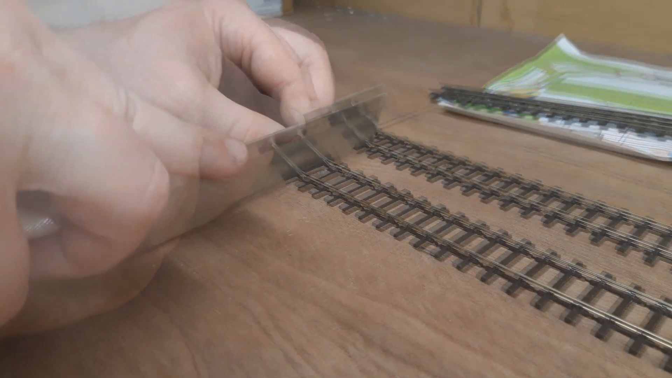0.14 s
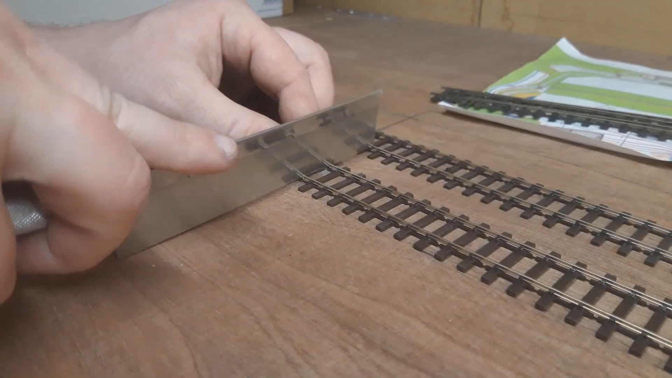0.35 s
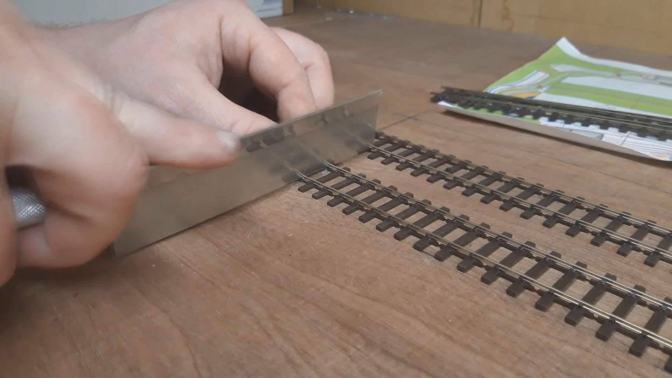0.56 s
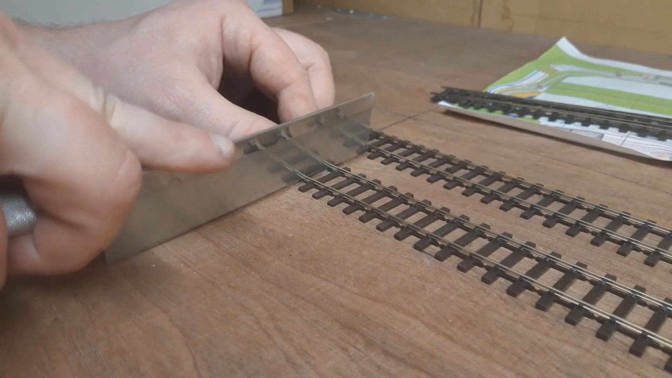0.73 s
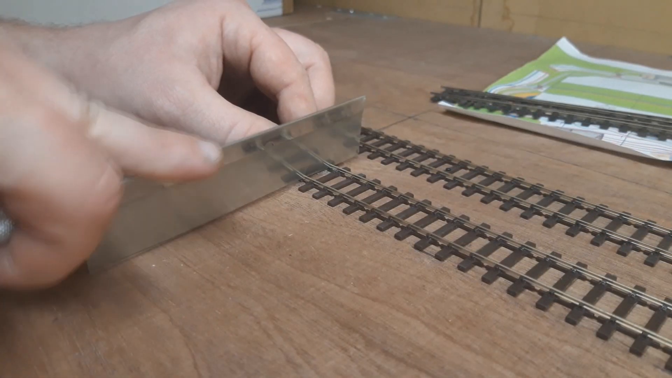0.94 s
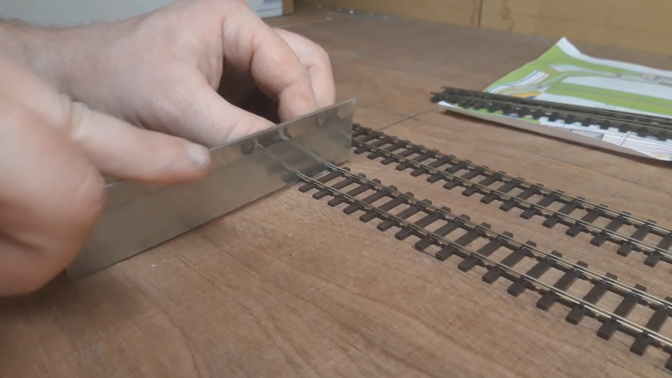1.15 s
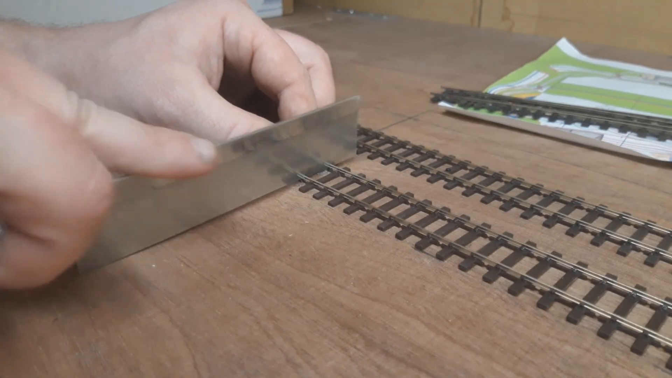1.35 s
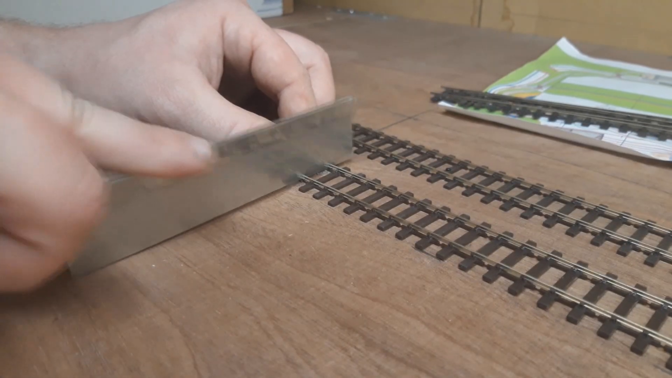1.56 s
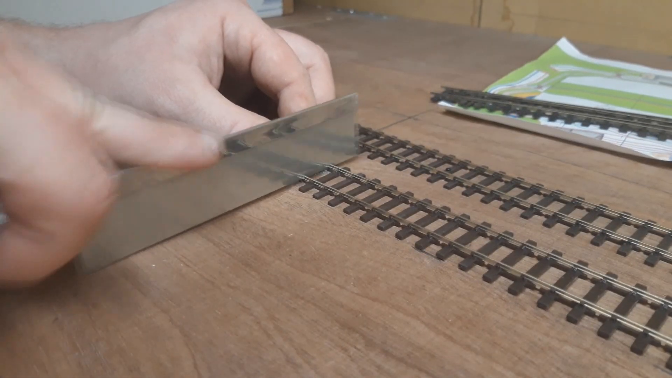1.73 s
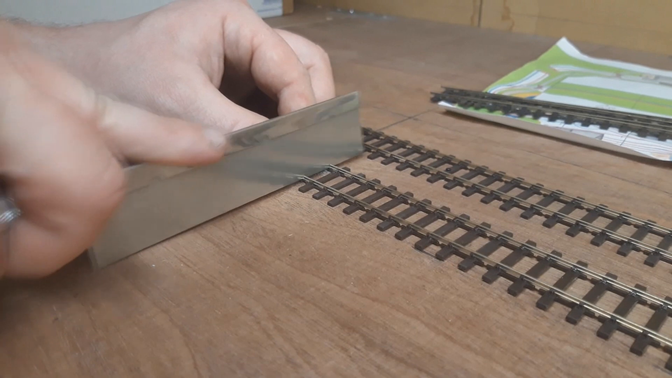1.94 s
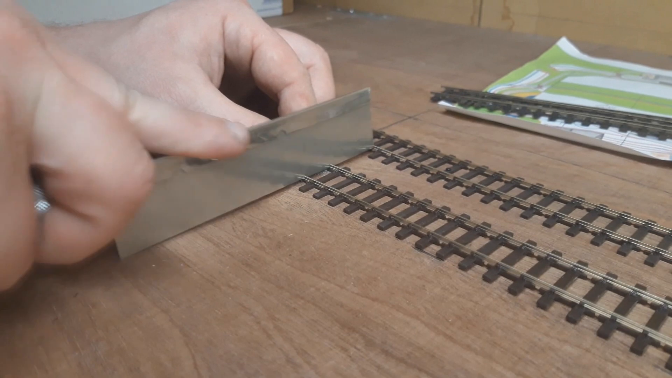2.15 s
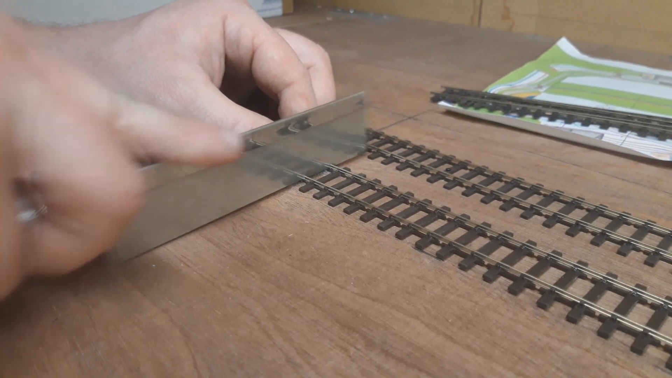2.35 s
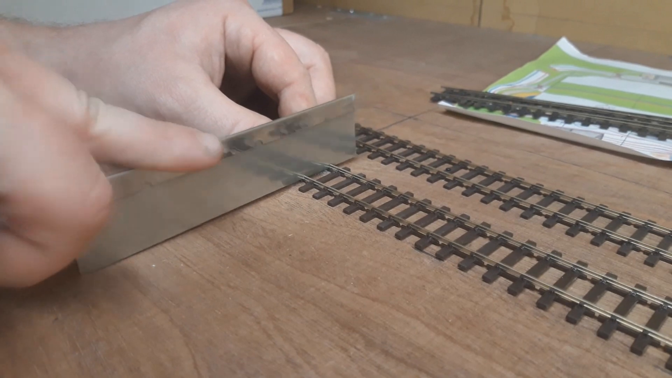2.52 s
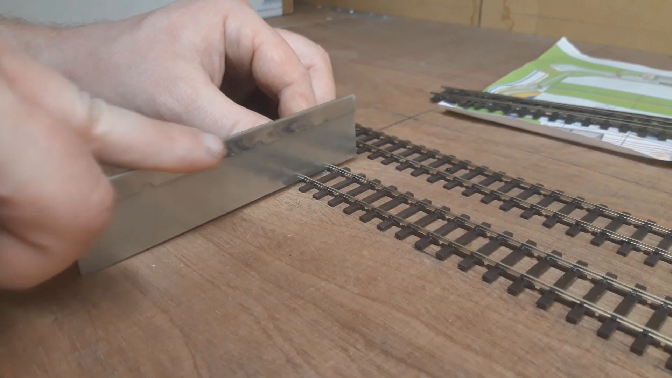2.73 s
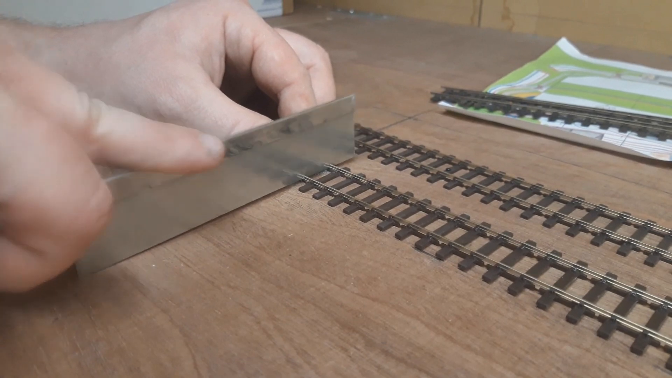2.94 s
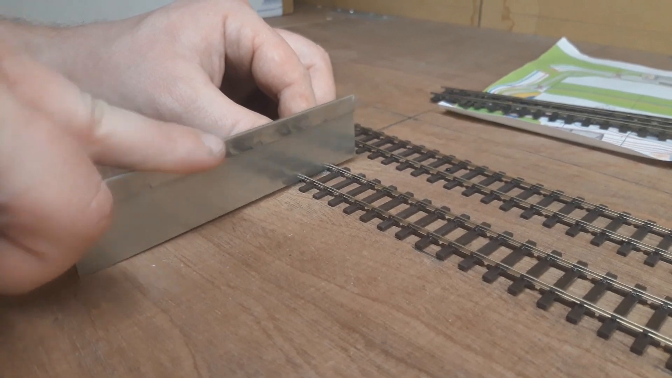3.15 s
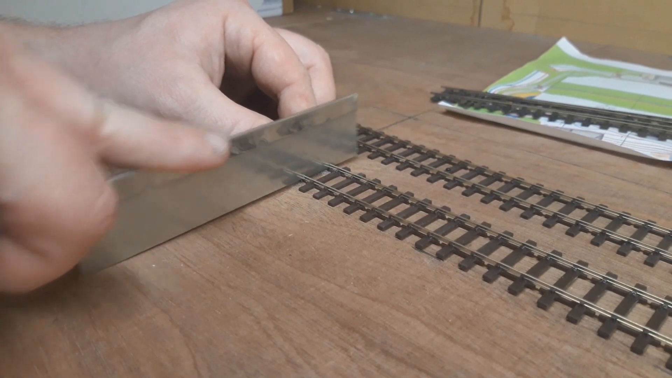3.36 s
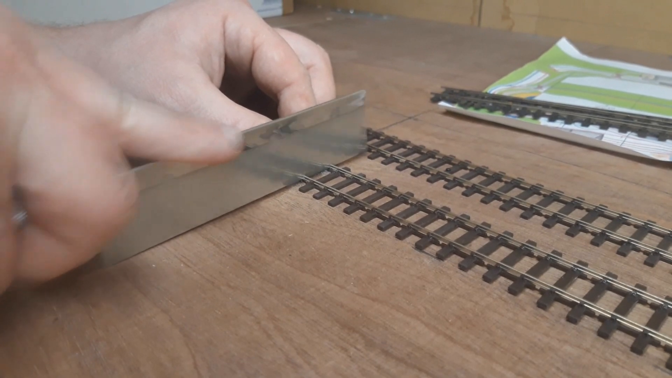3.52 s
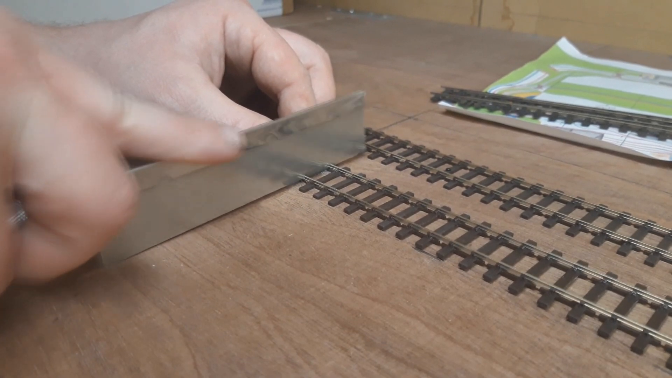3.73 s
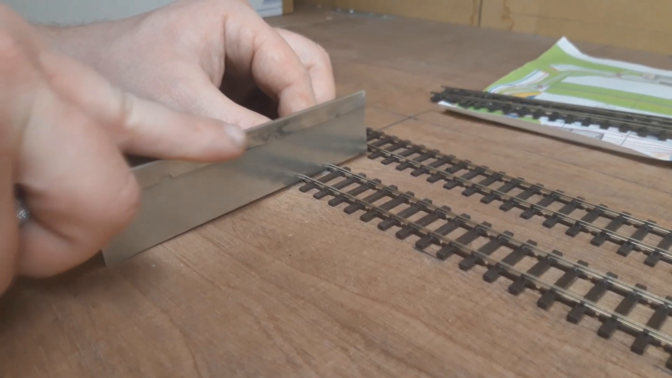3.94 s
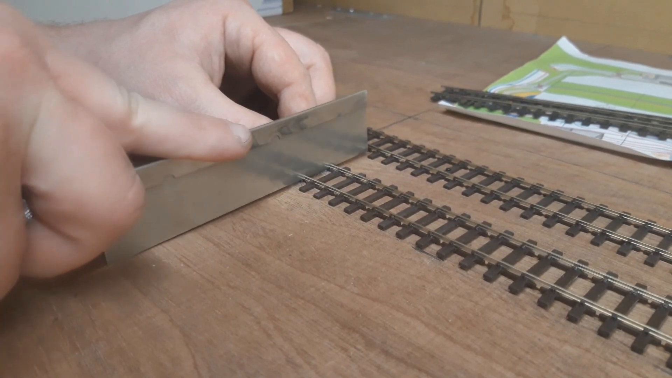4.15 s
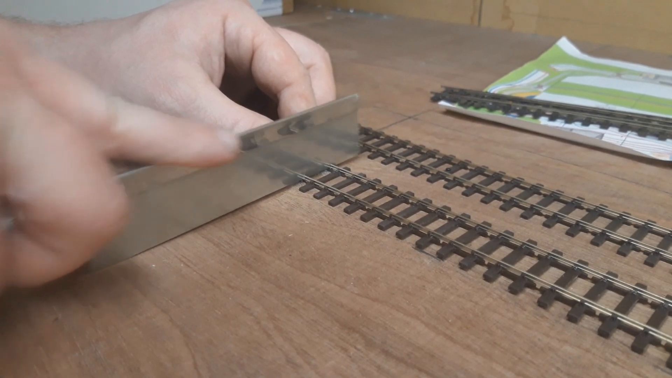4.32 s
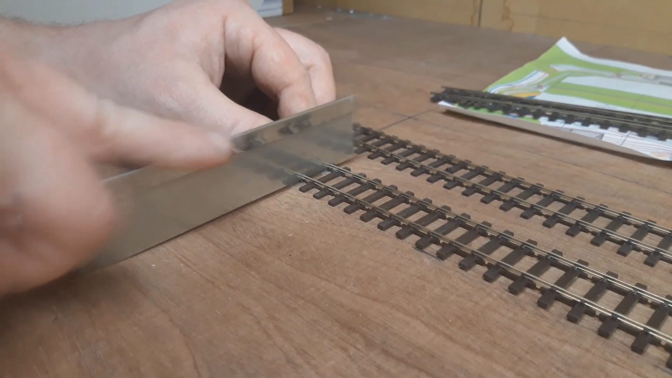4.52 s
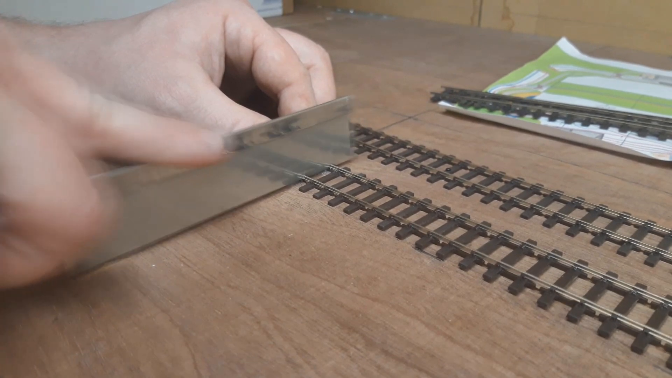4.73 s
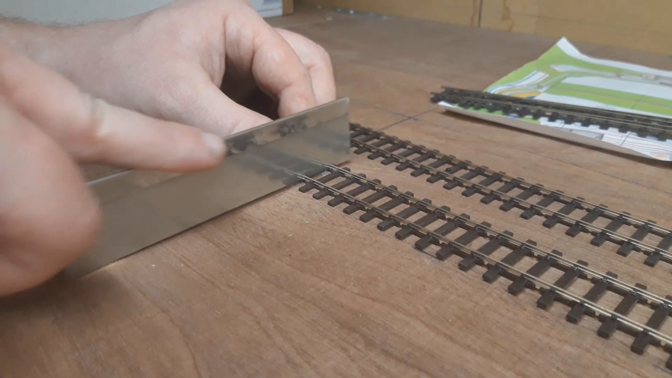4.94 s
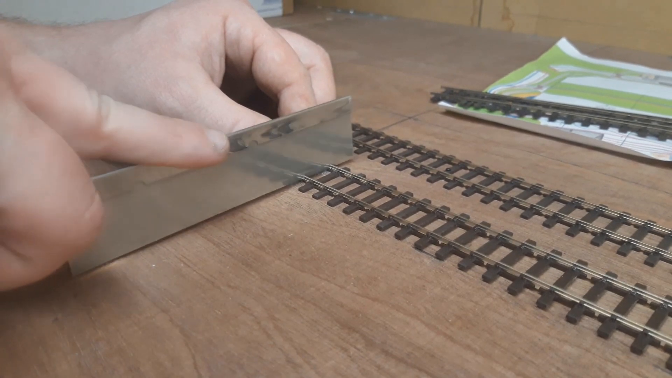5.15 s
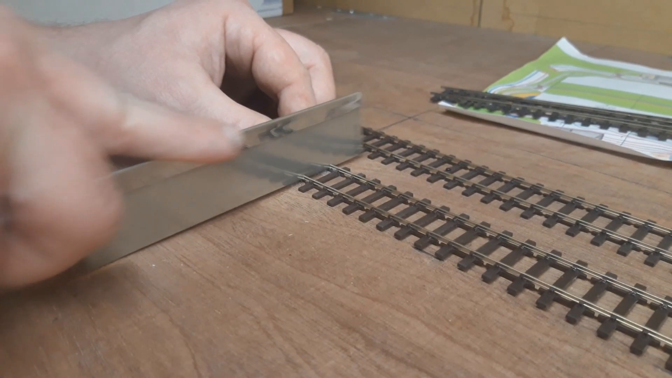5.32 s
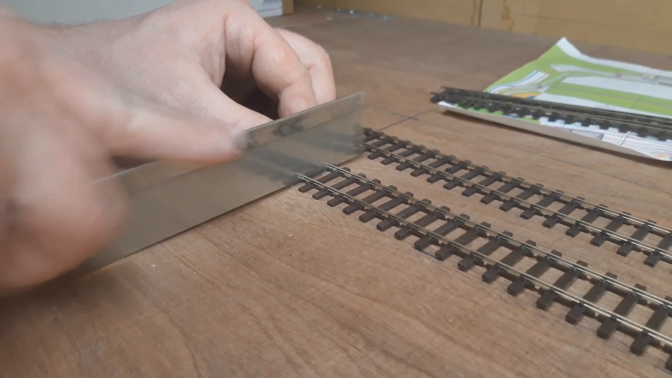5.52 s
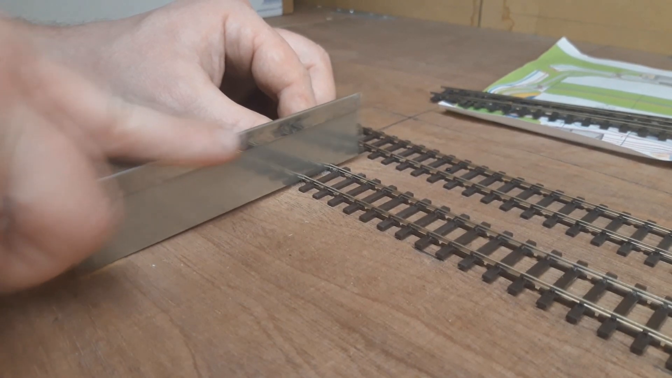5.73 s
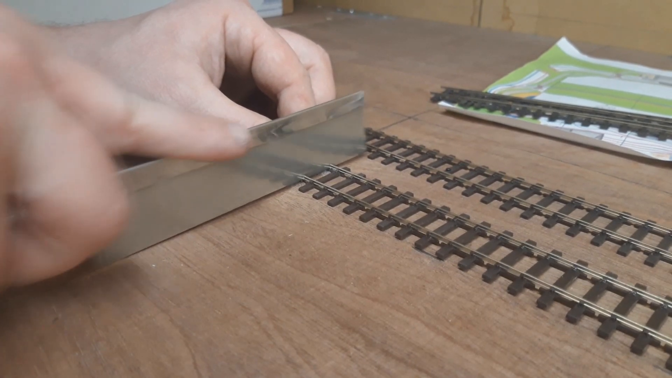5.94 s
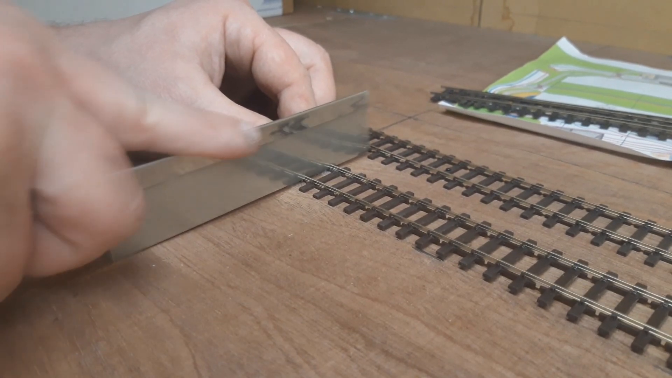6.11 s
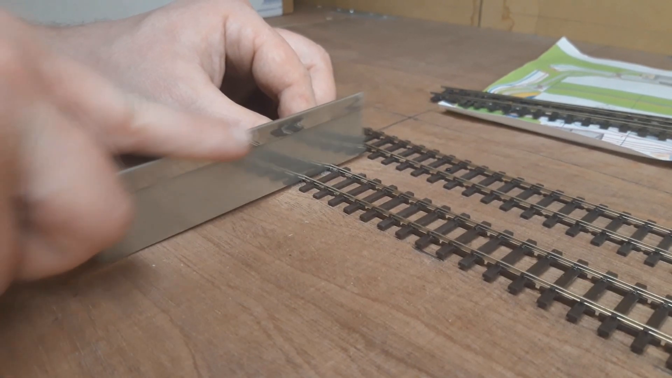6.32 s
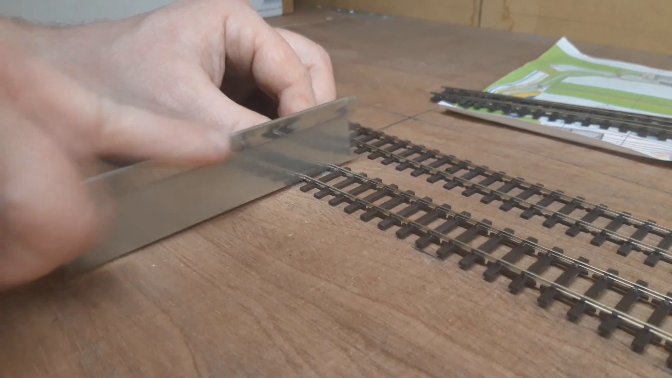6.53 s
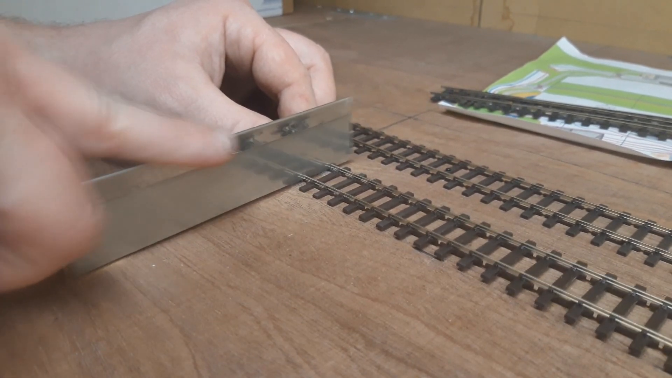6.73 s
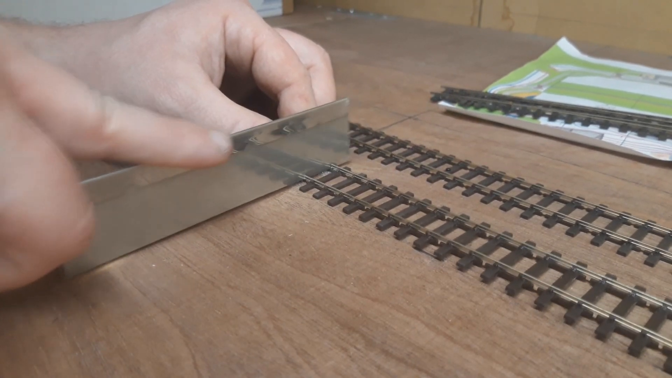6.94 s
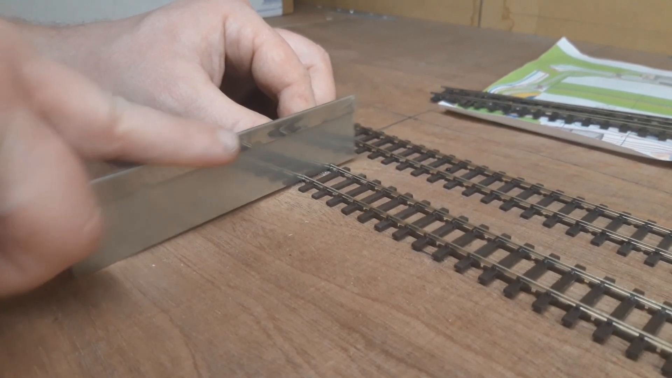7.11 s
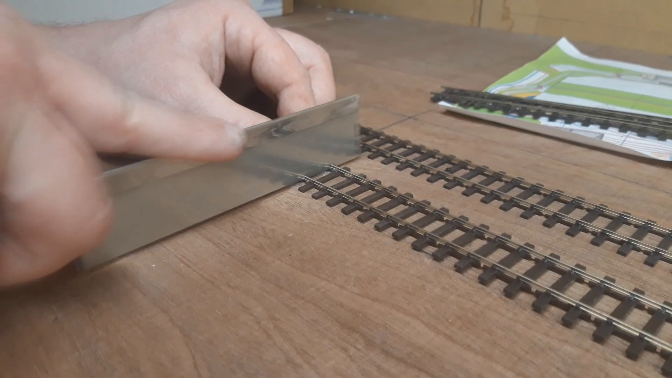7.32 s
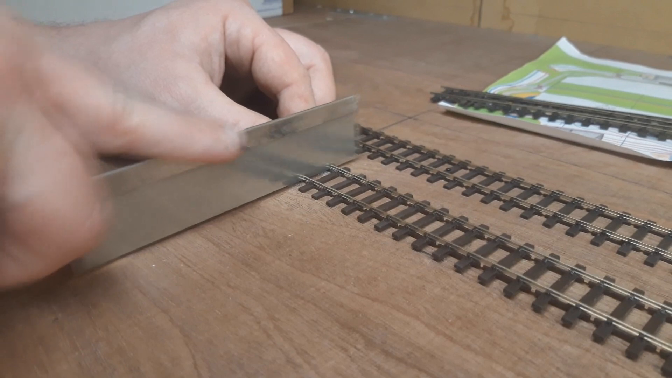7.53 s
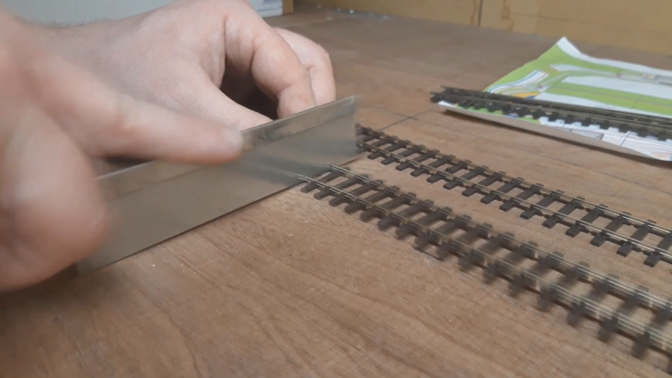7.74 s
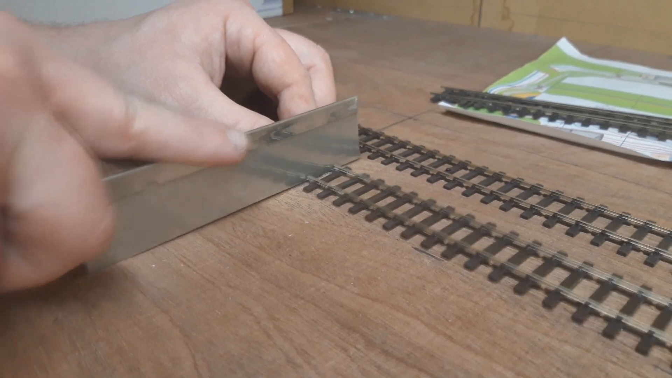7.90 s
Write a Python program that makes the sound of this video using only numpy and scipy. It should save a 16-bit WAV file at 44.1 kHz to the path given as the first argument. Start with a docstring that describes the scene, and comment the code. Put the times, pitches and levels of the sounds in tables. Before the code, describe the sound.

A close, mono-like perspective in a small room with faint low room tone. At 0.1 s a soft tap, around 0.27 s a brief light slide of the blade, then small knocks and a loud sharp snap at 0.64 s. From 0.64 to 2.05 s the saw catches in short separate rasps of under a tenth of a second, fairly dull, with clicks, strongest near 1.47 s. From 2.1 to 7.55 s it saws steadily at about nine strokes a second, alternating growling pushes and lighter returns, gritty bright thin steel over a buzzing wooden tabletop. There is a brief dip around 3.35 s; strokes are hardest from 5.5 to 6.6 s, with hard snaps at 6.5-6.6 s. After 6.8 s it falters and lightens, snags clicking often, a sharp one at 7.7 s, ending in weak broken scrapes to about 8 s.

```python
"""A small razor saw cuts a model railway rail held against a guide on a wooden table, close by in a small room.
The blade is set down with a few taps, catches in short bursts, then makes about nine strokes a second.
Trains of tooth blows, partly torn into noise, excite the resonances of thin steel and table top.
Now and then a tooth snags and snaps free: an impulse with decaying noise. Friction noise marks the blade
sliding into place, a short room tail follows the sounds, and a faint room tone lies beneath."""
import sys
import numpy as np
from scipy import signal
from scipy.fft import rfft, irfft, next_fast_len
from scipy.io import wavfile
from scipy.ndimage import uniform_filter1d, map_coordinates

SR = 44100
rng = np.random.default_rng(int(sys.argv[2]) if len(sys.argv) > 2 else 0)


def inscribe(sig):
    """Save sig as 16-bit PCM at rate SR to the path in sys.argv[1].

    A 1-D sig is mono; a 2-D sig holds one channel per row.
    Samples are clipped to [-1, 1] before scaling.
    """
    pcm = np.round(np.clip(np.atleast_2d(sig).T, -1, 1) * 32767)
    wavfile.write(sys.argv[1], SR, pcm.astype(np.int16))


N = 355877

# Room tone spectrum. Each row: frequency in Hz, relative density in dB per Hz.
AIR_SPECTRUM = [(25, -13), (115, 0.5), (350, -19.5), (1100, -34.5), (16000, -35)]
# Reverberation of the room. Each row: frequency in Hz, time to decay by 60 dB in seconds.
ROOM_DECAY = [(100, 0.57), (260, 0.22), (700, .18), (1800, 0.24), (13000, 0.13)]
# The blade slides lightly into place. Each row: time in seconds, friction level in dB.
SLIDE_LEVEL = [(0.21, -75), (0.235, -72), (0.275, -51), (0.311, -68), (0.35, -82)]
# Taps and snagging teeth. Each row: start in seconds, snap level in dB,
# table knock in dB relative to the snap, before a cut common to all knocks.
SNAG_EVENTS = [(0.0997, -28, 0), (0.404, -47, 10.5), (0.4746, -52, 0), (0.6, -31, -2.5), (0.6397, -5.5, 3),
               (0.7455, -14, -33), (0.9978, -13.5, -12), (1.4515, -17, -2), (1.472, -6, -7),
               (1.654, -10.5, -15), (1.9584, -21, -13), (2.4408, -17, -3), (3.3047, -22, -12),
               (6.096, -17, -8), (6.5126, -12, -7), (6.5503, -0.5, -16), (6.6001, -3, -10.5),
               (6.796, -15, -19), (7.0673, -16, -2), (7.139, -16, 0.5), (7.2304, -17.5, -10.5),
               (7.3634, -13, -8), (7.45, -19.5, -10), (7.668, -13, -8), (7.6947, -3.5, -11.5),
               (7.785, -17, -20), (7.8607, -22.5, 7), (7.8932, -16, -5)]
# Broad colour of the table top. Each row: frequency in Hz, relative density in dB per Hz.
TABLE_SPECTRUM = [(30, -36), (55, -17.5), (78, -7), (110, -20), (165, -0.5), (265, -7.5), (400, -3),
                  (520, -4.5), (800, -3.5), (1000, -17), (1400, -17.5), (2200, -22), (5000, -59)]
# Resonances of the table top. Each row: frequency in Hz, width in Hz, lift in dB.
TABLE_RESONANCES = [(180, 19, 1), (325.6, 11.5, 6.3), (482, 5.9, 3.8), (840, 6.5, 1.4), (1034, 78, 7.2),
                    (1325, 68, 7.2)]
# Broad colour of blade and rail. Each row: frequency in Hz, relative density in dB per Hz.
STEEL_SPECTRUM = [(300, -24), (1000, 4), (1600, -6), (2400, -5.5), (4000, 0), (6200, 1), (7500, 3.5),
                  (8800, 0), (10000, -12.5), (11700, -8), (13500, -15), (16000, -19)]
# Resonances of blade and rail. Each row: frequency in Hz, width in Hz, lift in dB.
STEEL_RESONANCES = [(1830, 120, 8.9), (2700, 370, 4.5), (3550, 230, 5.4), (4970, 47, 3.9), (7200, 120, 3.6),
                    (7760, 140, 1.6)]
# The rasp brightens as the teeth settle into the groove. Each row: time in seconds, treble gain in dB.
GROOVE_TREBLE = [(0.1, -25), (1.0, -7.5), (3.0, -1), (7.7, -0.5)]
# Separate catching strokes before and after the steady run.
# Each row: start in seconds, length in seconds, rasp level in dB, table level in dB.
CATCHING_STROKES = [(0.64, 0.038, -27, -25.5), (0.745, 0.036, -36, -39), (0.862, 0.084, -31, -32.5),
                    (0.984, 0.028, -28.5, -36.5), (1.1, 0.065, -27.5, -23.5), (1.23, 0.075, -27.5, -27),
                    (1.322, 0.055, -36.5, -35.5), (1.449, 0.053, -29.5, -24), (1.519, 0.083, -28.5, -29),
                    (1.649, 0.085, -27, -26), (1.742, 0.073, -30, -32), (1.864, 0.084, -28, -28),
                    (1.98, 0.084, -35.5, -31), (7.667, 0.03, -31.5, -29.5), (7.782, 0.05, -35.5, -33),
                    (7.852, 0.068, -38.5, -40), (7.958, 0.069, -42.5, -36.5)]
# Rhythm of the steady run, evenly paced between marks. Each row: time in seconds, count of strokes done.
STROKE_PACE = [(2.094, 0), (2.348, 2), (2.589, 4), (3.25, 10), (3.458, 12), (3.677, 14), (4.128, 18),
               (4.553, 22), (4.881, 25), (5.222, 28), (5.659, 32), (5.869, 34), (6.314, 38), (6.664, 41),
               (6.989, 44), (7.12, 45), (7.55, 49)]
# How hard the hand bears down in the run. Each row: time in seconds, rasp level of a push in dB.
HAND_EFFORT = [(2.09, -24.5), (2.7, -25.5), (3.03, -24), (3.25, -25), (3.35, -31.5), (3.46, -26.5),
               (3.79, -26.5), (4.13, -23), (4.67, -22.5), (5.11, -23.5), (5.54, -20.5), (5.76, -25.3),
               (6.09, -21.5), (6.55, -20.5), (6.88, -29), (7.12, -24.5), (7.33, -32.5), (7.55, -30.5)]
# How much of each stroke the blade is moving. Each row: time in seconds, share from 0 to 1.
MOVING_SHARE = [(2.09, 0.88), (2.6, 0.69), (3.25, .66), (3.65, .77), (4.34, .61), (4.95, 0.83), (5.7, .71),
                (6.2, 0.78), (6.99, .6), (7.12, 0.44), (7.22, 0.64), (7.55, 0.59)]

RETURN_DB, RETURN_EARLY_S = -2, .002  # the return is lighter than the push, and comes a little early
RETURN_TABLE_DB = .5  # the return loses less on the table than in the steel
# an ordinary stroke; its tooth rate is that of mid-stroke, before judder
USUAL_RASP_DB, USUAL_TABLE_DB, USUAL_TOOTH_HZ = -25, -24.5, 878.2
# a harder stroke drums louder and runs faster: dB of table level and of tooth rate per dB of rasp
TABLE_DB_PER_DB, TOOTH_RATE_DB_PER_DB = 0.75, 0.29
TOP_HZ = 16000  # upper band limit


def amp(db):
    """Level and amplitude: decibels to linear gain."""
    return 10 ** (np.asarray(db) / 20)


def unit(x):
    """Normalisation: scale to an rms of 1."""
    return x / np.sqrt(np.mean(x ** 2) + 1e-20)


def along(points, hz):
    """Logarithmic frequency scale: interpolate (Hz, value) points along it."""
    f, v = np.transpose(points)
    return np.interp(np.log(hz + 1), np.log(f + 1), v)


def add(track, s, x):
    """Superposition: mix x into the track at time s."""
    part = track[max(round(s * SR), 0):][:len(x)]
    part += x[:len(part)]


def wobble(rate, n):
    """Random modulation: a smooth curve of n samples through random knots, rate knots a second."""
    knots = rng.standard_normal(SR // 100)
    return map_coordinates(knots, [np.arange(n) * rate / SR], mode="mirror")


def body(x, spectrum, modes=(), size=8192):
    """Resonance: ring x through a minimum-phase response of unit energy, a broad colour with peaks on it."""
    hz = np.fft.rfftfreq(size, 1 / SR)
    level = along(spectrum, hz)
    for f, width, lift in modes:
        level = level + lift / (1 + (2 * (hz - f) / width) ** 2)
    # folding the cepstrum onto positive time makes the response causal
    cepstrum = irfft(np.log(amp(level)))
    cepstrum[1:size // 2] *= 2
    cepstrum[size // 2 + 1:] = 0
    response = irfft(np.exp(rfft(cepstrum)))
    return signal.fftconvolve(x, response / np.linalg.norm(response))[:N]


def room_tone():
    """Background noise: steady random pressure with most of its energy at low frequencies."""
    return amp(-64) * body(rng.standard_normal(N), AIR_SPECTRUM)


def room(x, wet_db, count=24):
    """Reverberation: a diffuse, decaying tail, crossfaded between random ones as hands and blade move."""
    out = np.zeros(N)
    place = np.linspace(0, count - 1, N)
    for k in range(count):
        hz, t, z = signal.stft(rng.standard_normal(SR // 3), SR, nperseg=256)
        decay = amp(-60 * t / along(ROOM_DECAY, hz)[:, None])
        tail = signal.istft(z * decay, SR, nperseg=256)[1]
        tail = tail / np.linalg.norm(tail)
        near = np.flatnonzero(np.abs(place - k) < 1)
        share = np.cos(np.pi / 2 * (place[near] - k))
        add(out, near[0] / SR + .003, signal.fftconvolve(x[near] * share, tail))
    return (x + amp(wet_db) * out) / np.hypot(1, amp(wet_db))


def sliding():
    """Sliding friction: the blade rubs lightly on the guide, noise heard through the table."""
    s, db = np.transpose(SLIDE_LEVEL)
    level = np.interp(np.arange(N) / SR, s, amp(db), left=0, right=0)
    colour = [(100, -9), (700, 2), (1200, -28), (8000, -28), (11000, -50)]  # Hz, dB per Hz
    return level * body(rng.standard_normal(N), colour)


def snags():
    """Impulsive release: a tap or freed tooth gives a sharp snap, a short blade chatter and a table knock."""
    steel, table = np.zeros((2, N))
    t = np.arange(SR // 8) / SR
    for s, db, knock_db in SNAG_EVENTS:
        snap, chatter, knock = rng.standard_normal((3, len(t)))
        # each noise falls by 60 dB in the time it is divided by, in seconds
        crack = amp(-9.5) * snap * amp(-60 * t / 0.0094)
        crack += amp(-9.0) * chatter * amp(-60 * t / 0.035)
        crack[0] += amp(1.0)
        add(steel, s, amp(db) * crack)
        blow = amp(-4.5) * knock * amp(-60 * t / 0.12)
        blow[0] += amp(11)
        add(table, s, amp(db + knock_db - 6.5) * blow)
    return steel, table


def brighten(x):
    """Spectral tilt: the steel's treble rises against its midrange as the cut deepens."""
    s, treble_db = np.transpose(GROOVE_TREBLE)
    dull = signal.sosfilt(signal.butter(1, 4500, fs=SR, output="sos"), x)
    treble = x - dull
    return dull + amp(np.interp(np.arange(N) / SR, s, treble_db)) * treble


def steady_run():
    """Reciprocating motion: (start s, length s, rasp dB, table dB) of each alternate push and return."""
    mark_s, done = np.transpose(STROKE_PACE)
    stroke = np.arange(round(done[-1]) + 1)
    returning = stroke % 2
    beat = np.interp(stroke, done, mark_s)
    length = np.gradient(beat) * np.interp(beat, *np.transpose(MOVING_SHARE))
    rasp_db = np.interp(beat, *np.transpose(HAND_EFFORT)) + RETURN_DB * returning
    harder_db = rasp_db - USUAL_RASP_DB
    table_db = USUAL_TABLE_DB + TABLE_DB_PER_DB * harder_db + RETURN_TABLE_DB * returning
    return list(zip(beat - RETURN_EARLY_S * returning, length, rasp_db, table_db))


def strokes():
    """Alternation: all strokes in order of time, return and push in turn."""
    return sorted([*CATCHING_STROKES, *steady_run()], key=lambda stroke: stroke[0])


def teeth(passed, skip_db, scatter_db):
    """Periodic impact: one blow per passing tooth, a few hard; teeth set left and right bite unequally."""
    tooth = np.arange(int(passed[-1]) + 1)
    size = rng.exponential(size=SR // 100)[:len(tooth)]
    strength = amp(scatter_db * size + skip_db * (tooth % 2))
    return np.bincount(np.searchsorted(passed, tooth), strength, len(passed))


def tearing(blows, chip_s, grit_db):
    """Fracture noise: each tooth tears a chip, a brief decaying spray of uneven micro-fractures."""
    spray = signal.lfilter([1], [1, -np.exp(-1 / (chip_s * SR))], blows)
    grit, size = rng.standard_normal((2, SR // 4))[:, :len(blows)]
    return unit(spray * grit * amp(grit_db * size))


def sawing():
    """Forced excitation: teeth grip at once, the hand speeds up and stops; tooth rate and force follow."""
    steel, table = np.zeros((2, N))
    for k, (s, length, rasp_db, table_db) in enumerate(strokes()):
        pushing = k % 2 == 1
        rate_hz = USUAL_TOOTH_HZ * amp(TOOTH_RATE_DB_PER_DB * (rasp_db - USUAL_RASP_DB))
        n = int(np.clip(length * SR, SR // 100, SR // 4))
        t, way = np.arange(n) / SR, np.linspace(0, 1, n)
        arch = np.abs(np.sin(np.pi * way))
        speed = arch ** .38 * amp(1.5 * wobble(500, n))  # the blade judders as it runs
        passed = np.cumsum(speed) * rate_hz / SR  # teeth gone by
        if pushing:  # the teeth of one side dig in, hardest at the start: a growl an octave down
            blows = teeth(passed, skip_db=-13.5, scatter_db=2.5)
            ripple = amp(-14.5) * arch * np.cos(np.pi * passed)
            pressure_db = -5 * (way - .5)
        else:  # returning, all teeth skid over the rail
            blows = teeth(passed, skip_db=-3.5, scatter_db=2.5)
            ripple = amp(-21.5) * arch * np.cos(2 * np.pi * passed)
            pressure_db = -1.1 * (way - .5)
        grip = (1 - np.exp(-t / 0.00073)) * np.minimum((1 - way) / 0.12, 1)
        # a firm stroke cuts evenly, a light one catches and stutters
        catching_db = np.interp(rasp_db, [-34, -26], [2.7, 1.2]) * wobble(150, n)
        force = grip * amp(pressure_db + 5.4 * (arch - 1.5) + catching_db)

        rasp = tearing(blows, chip_s=0.003, grit_db=2.5)
        # waves bounce off the blade's end, a different way off in each stroke
        bounce = SR // rng.integers(2000, 8000)
        echoed = unit(rasp + amp(-13.5) * np.roll(rasp, bounce))
        add(steel, s, amp(rasp_db) * force * echoed)

        # steady pressure makes no sound: remove the local mean
        drumming = unit(blows - uniform_filter1d(blows, size=SR // 150))
        scraping = tearing(blows, chip_s=0.0038, grit_db=4.0)
        if not pushing:  # the lightly loaded return hardly bends the table: no deep rumble
            scraping = unit(scraping - uniform_filter1d(scraping, size=SR // 350))
        shaking = ripple + amp(-5.5) * drumming + amp(-1.5) * scraping
        add(table, s, amp(table_db) * force * shaking)
    return steel, table


def scene():
    """Shared resonators: strokes and snags ring the same steel and table top, over faint room tone."""
    rasp, drum = sawing()
    snap, knock = snags()
    steel = room(body(brighten(rasp + snap), STEEL_SPECTRUM, STEEL_RESONANCES), wet_db=-10.5)
    table = room(body(drum + knock, TABLE_SPECTRUM, TABLE_RESONANCES), wet_db=-7.0)
    return (steel + table + sliding() + room_tone())[None]


def record(dry):
    """Saturation and band limiting: peaks round off below 0.8, then nothing passes from TOP_HZ up."""
    held = dry / (1 + (dry / .8) ** 6) ** (1 / 6)
    size = next_fast_len(N + SR // 2)
    passband = np.fft.rfftfreq(size, 1 / SR) < TOP_HZ
    return irfft(rfft(held, size) * passband, size)[:, :N]


dry = scene()
out = record(dry)
inscribe(out)
```